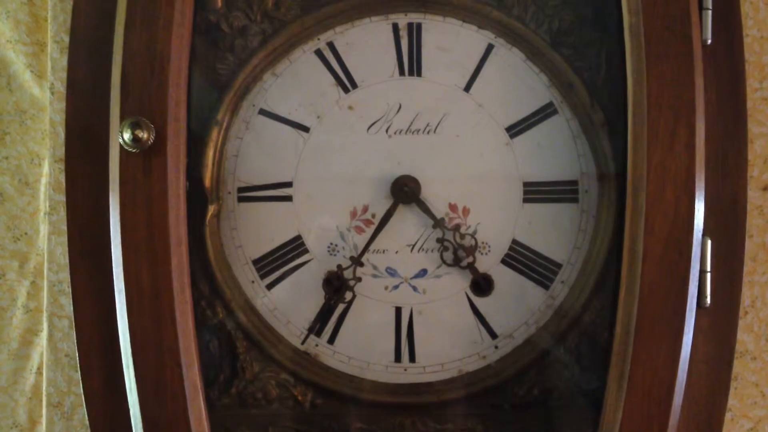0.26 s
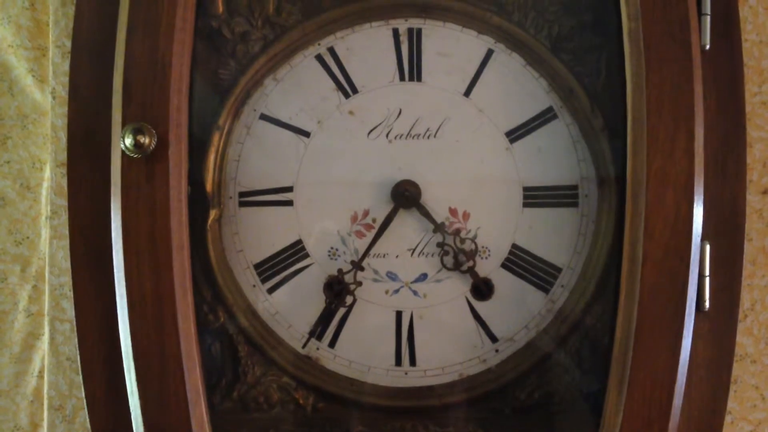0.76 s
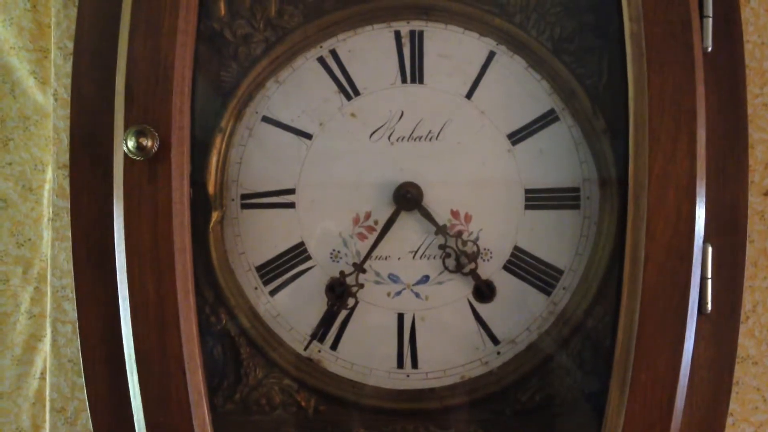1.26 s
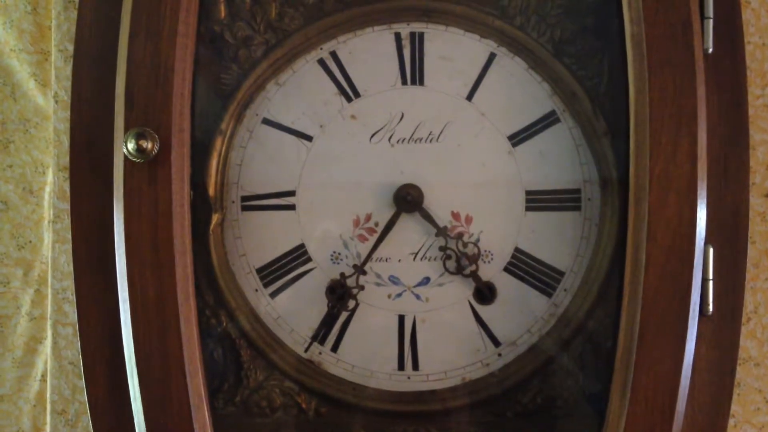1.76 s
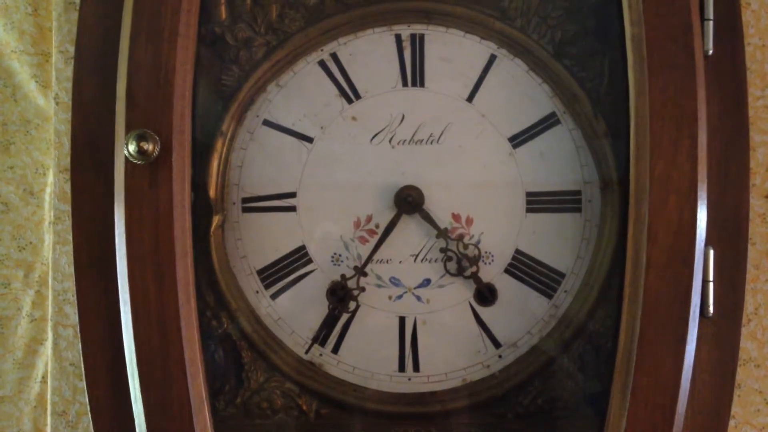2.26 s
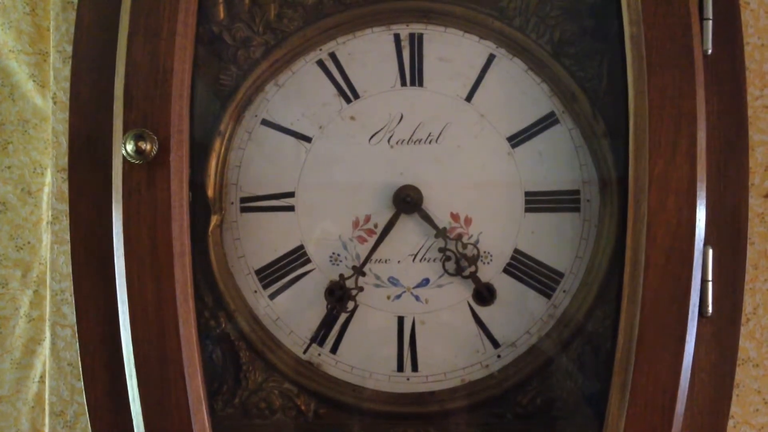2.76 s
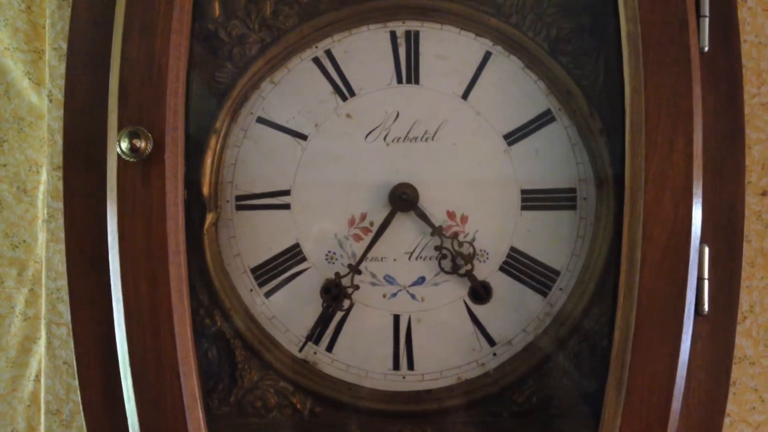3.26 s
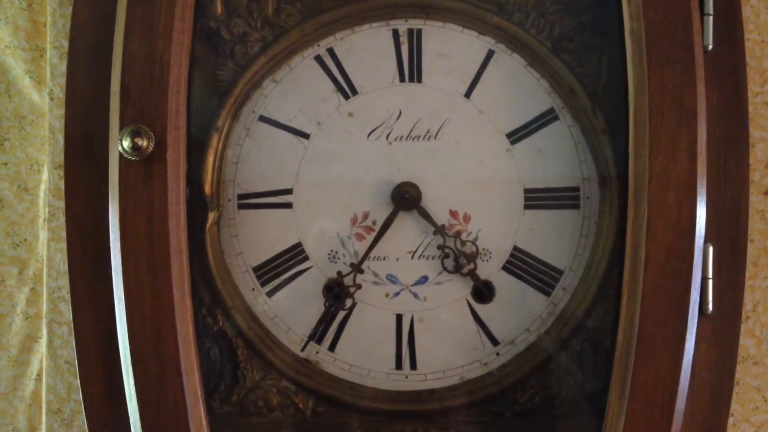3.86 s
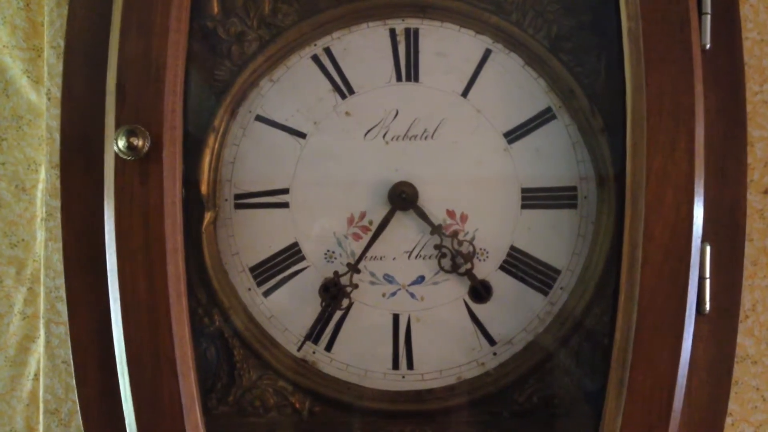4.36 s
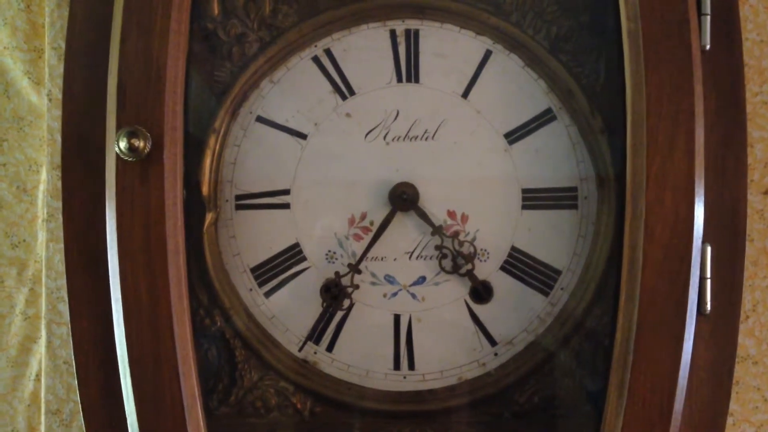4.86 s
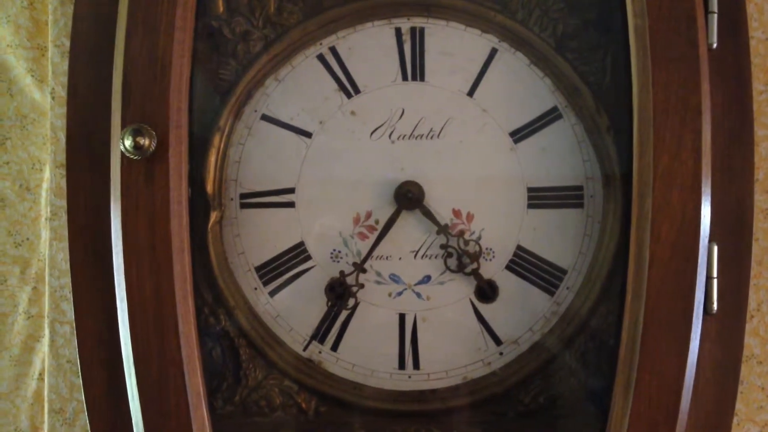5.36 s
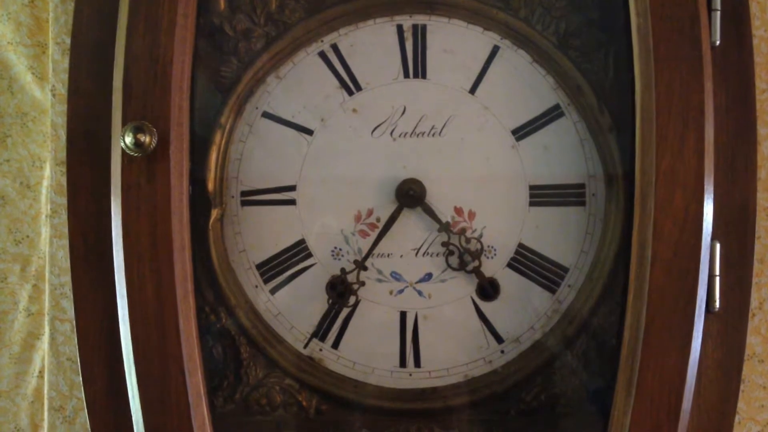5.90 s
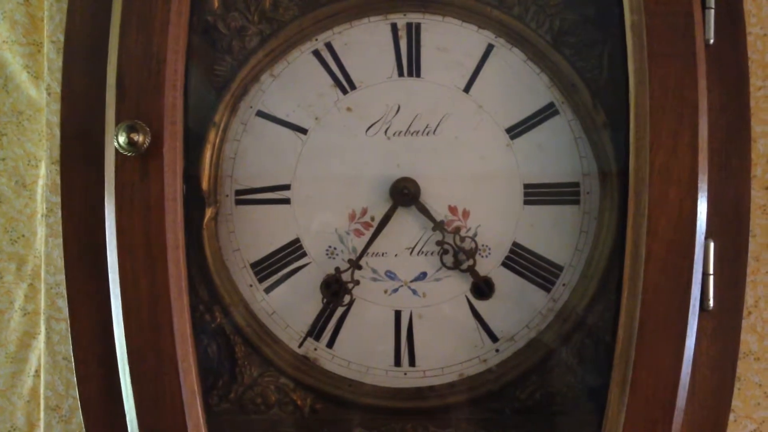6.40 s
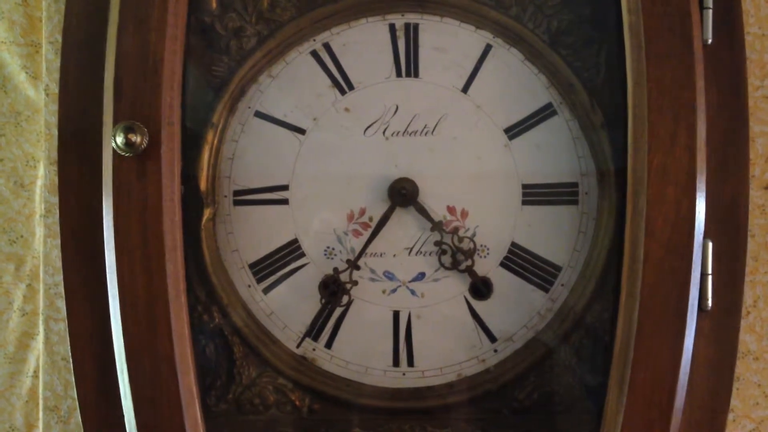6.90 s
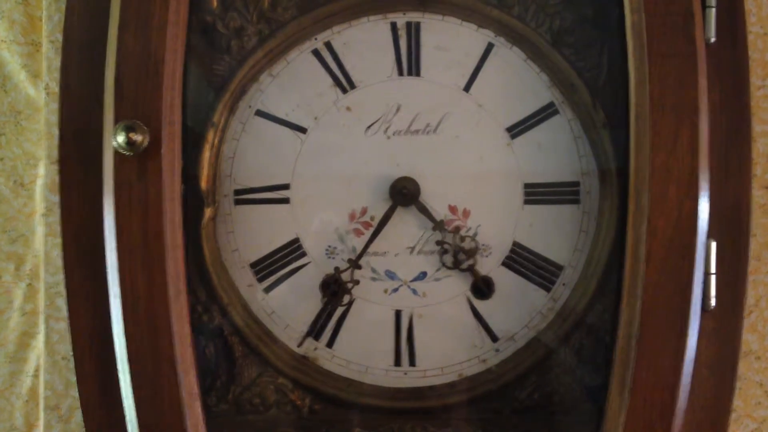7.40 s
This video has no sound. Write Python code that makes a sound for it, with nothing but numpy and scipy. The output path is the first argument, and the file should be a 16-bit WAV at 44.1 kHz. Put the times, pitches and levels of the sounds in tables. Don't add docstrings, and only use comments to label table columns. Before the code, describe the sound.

A tall wooden pendulum clock ticks and tocks slowly, each beat a crisp brassy click with a short woody knock, in a quiet room.

```python
import sys
import numpy as np
from scipy import signal
from scipy.io import wavfile

SR = 44100
rng = np.random.default_rng(int(sys.argv[2]) if len(sys.argv) > 2 else 0)


def output_pcm(signal):
    pcm = np.clip(np.atleast_2d(signal).T, -1, 1) * 32767
    wavfile.write(sys.argv[1], SR, np.round(pcm).astype(np.int16))


def how_loud(loudness_db):
    steps = np.asarray(loudness_db, float) / 20
    return 10 ** steps


N = 336924

# drop_s, lock_after_drop_s
BEATS = [
    (.336, .0141),
    (1.369, .0173),
    (2.5018, .0152),
    (3.5105, .0211),
    (4.6117, .0139),
    (5.645, .0178),
    (6.798, .0122),
]
# drop_db, slide_db, lock_db, rest_after_lock_s, rest_db
BLOWS = [(-23, -27, -22.5, .068, -44.5), (-32.5, -23.5, -24, .046, -42), (-22.5, -23.5, -21.5, .047, -46),
         (-29.5, -35, -18, .045, -57), (-21.5, -22, -22.5, 0.067, -48), (-30.5, -28.5, -19.5, .040, -42),
         (-22.5, -23.5, -21.5, .058, -38)]
# first_after_lock_s, gap_s, first_db, last_db
REBOUNDS = [(0.016, .013, -28, -44.5), (.0097, .008, -26.5, -33.5), (.011, .0085, -25.5, -40),
            (.0085, .0085, -24, -47), (.0135, 0.013, -22.5, -42), (.0055, .007, -22.5, -32.5),
            (.0138, .009, -22.5, -36)]
SLIDE_AFTER_DROP_S = 0.006
BOUNCE_STRETCH, BOUNCE_FADE_POWER = 1.12, 1.17


def contacts():
    rows = []
    for beat, ((drop_s, lock_after_s), blow, rebound) in enumerate(zip(BEATS, BLOWS, REBOUNDS)):
        drop_db, slide_db, lock_db, rest_s, rest_db = blow
        first_s, gap_s, first_db, last_db = rebound
        lock_s = drop_s + lock_after_s
        rows.append((drop_s, drop_db, beat, 0, 0))
        rows.append((drop_s + SLIDE_AFTER_DROP_S, slide_db, beat, 1, 0))
        rows.append((lock_s, lock_db, beat, 2, 0))
        age = np.cumsum(np.r_[0, gap_s * BOUNCE_STRETCH ** np.arange(3)])
        level = first_db + (last_db - first_db) * (age / age[-1]) ** BOUNCE_FADE_POWER
        rows += [(lock_s + first_s + a, db, beat, 3, a) for a, db in zip(age, level)]
        rows.append((lock_s + rest_s, rest_db, beat, 3, rest_s - first_s))
    return np.transpose(rows)


TICK_SHARES = {"case": (-6.5, 3, 2.5, 1.5, 90), "frame": (1.7, .5, 3, 1.7, 35),
               "plate": (-1.6, -2.5, 2.3, -0.5, -11), "wheel": (-0.3, .1, 0.3, -0.7, -5),
               "top": (-3, 3, 4.5, 3, -73)}
TOCK_SHARES = {"case": (2.5, 3.3, -8, -3.7, 129), "frame": (11, 3, -6, -0.5, 44),
               "plate": (1.5, 0, 1.4, -3.8, -40), "wheel": (-1.5, .1, -0.1, -0.7, -5),
               "top": (2.5, -2.5, -0.8, -0.8, -83)}
# case_db, frame_db, plate_db, wheel_db, top_db
TEETH = [(2, -0.5, 2.5, -1.5, 1.5), (-0.3, .1, 1, 0.3, -0.3), (0, -0.3, -1, 0.5, .1),
         (-0.3, -1, 1, -0.5, 0), (-0.5, -1.2, 0.5, .5, 1), (.1, 1, 1.5, -.5, 0.5),
         (0.8, -1.1, -0.5, .5, -0.5)]


def contact_db(hz, tick_db, tock_db):
    s, db, beat, role, age = contacts()
    beat, role = beat.astype(int), role.astype(int)
    tock = beat % 2 == 1
    parts = {2800: "case", 5800: "frame", 7700: "plate", 10000: "wheel", SR: "top"}
    part = next(name for upper_hz, name in parts.items() if hz < upper_hz)
    share = np.where(tock[:, None], TOCK_SHARES[part], TICK_SHARES[part])
    tooth_db = dict(zip(TICK_SHARES, np.transpose(TEETH)))[part][beat]
    pallet_db = np.where(tock, tock_db, tick_db)
    return db + pallet_db + share[np.arange(len(s)), role] + share[:, -1] * age + tooth_db


def clicks(times, sizes):
    train = np.full(N, 1e-18)
    train[np.round(np.asarray(times) * SR).astype(int)] = sizes
    return train


def ring(drive, hz, t60):
    r, w = how_loud(-60 / (t60 * SR)), 2 * np.pi * hz / SR
    return signal.lfilter([0, np.sin(w)], [1, -2 * r * np.cos(w), r * r], drive)


def swell(drive, seconds):
    r = np.exp(-1 / (seconds * SR))
    return signal.lfilter([(1 - r) ** 2], [1, -2 * r, r * r], drive)


def struck(modes, times, slide_s, gain_db, split):
    shape = len(times), len(modes)
    late, uneven, lean = rng.random(shape), rng.standard_normal(shape), rng.random(shape)
    out = np.zeros(N)
    for k, (hz, tick_db, tock_db, t60) in enumerate(modes):
        strength = how_loud(contact_db(hz, tick_db, tock_db) + 3.16 * uneven[:, k])
        arrival = times + slide_s * late[:, k] ** 2
        for side, share in ((-1.15, lean[:, k]), (0.92, lean[:, k] - 1)):
            out += ring(clicks(arrival, strength * share), hz * (1 + side * split), t60)
    return how_loud(gain_db) * out


# pitch_hz, tick_db, tock_db, t60_s
MOVEMENT = [(1521, -55, -17.5, 0.057), (1950, -25, -30, 0.1), (2242, -34, -39, 0.15),
            (2600, -30, -36, 0.12), (3402, -26.5, -21.5, 0.05), (4280, -18.5, -33, 0.038),
            (4426, -24, -29, 0.04), (4780, -26.5, -40, 0.047), (5363, -20.5, -18.5, 0.07),
            (6110, -22, -32, 0.088), (6590, -16, -15, 0.033), (6860, -8, -4.5, 0.037),
            (6850, -7.5, -7.5, 0.039), (7350, -13, -16.5, 0.041), (7800, -20, -30, 0.078),
            (8030, -28, -19.5, 0.053), (8270, -8.5, -2.5, 0.036), (8420, -16, -21.5, 0.13),
            (8560, -11.5, -10.5, 0.052), (8470, -27, -27, .055), (8920, -10.5, -11, 0.026),
            (9280, -19.5, -20, .06), (11080, -21.5, -14, 0.051), (11430, -25, -24, 0.043),
            (13600, -18, -22, 0.05), (15360, -21, -28, 0.036)]


def movement(times):
    return struck(MOVEMENT, times, slide_s=0.004, gain_db=1.5, split=0.0048)


# start_s, first_db, second_db, third_db
RODS = [(0.351, -56, -53, -60), (1.388, -48, -73, -64), (2.517, -48, -58, -60), (3.531, -56, -61, -60),
        (4.627, -48, -53, -60), (5.664, -45.5, -63, -58), (6.81, -60.5, -48, -45)]
# pitch_hz, t60_s
ROD_MODES = [(2425, 0.26), (2570, 0.33), (5320, 0.26)]


def rods():
    s, *levels = np.transpose(RODS)
    return sum(ring(clicks(s, how_loud(db)), hz, t60) for db, (hz, t60) in zip(levels, ROD_MODES))


def at_hz(points, hz):
    pitch, *columns = np.transpose(points)
    return [np.interp(np.log(hz), np.log(pitch), column) for column in columns]


def noise_bands(low_hz, high_hz, count):
    edges = np.geomspace(low_hz, high_hz, count + 1)
    white = rng.standard_normal((2, N))
    for k, (low, high) in enumerate(zip(edges, edges[1:])):
        sos = signal.butter(2, [low, high], "band", fs=SR, output="sos")
        yield np.sqrt(low * high), signal.sosfilt(sos, white[k % 2])


# pitch_hz, tick_db_per_hz, tock_db_per_hz, t60_s
RUSTLE = [(294.5, -15, -17.5, 0.6), (600, -15.5, -16, 0.45), (1187, -12.5, -19, 0.13),
          (2220, -16.5, -19.5, 0.28), (2750, -18, -20.5, 0.13), (4520, -15.5, -15.5, 0.13),
          (5900, -17, -23.5, 0.16), (6750, -15, -5, 0.048), (7800, -21.5, -11, 0.073),
          (8600, -10, -11, 0.1), (9660, -11, -30, 0.05), (11340, -12.5, -10, 0.074),
          (13500, -8, -6.5, 0.057), (16000, -12, -4, 0.0335)]


def rustle(times):
    out = np.zeros(N)
    for hz, band in noise_bands(300.3, 15900, count=26):
        tick_db, tock_db, t60 = at_hz(RUSTLE, hz)
        energy = clicks(times, how_loud(2 * contact_db(hz, tick_db, tock_db)))
        energy = signal.lfilter([1], [1, -how_loud(-120 / (t60 * SR))], energy)
        out += band * np.sqrt(swell(energy, seconds=0.00088 + 1.16 / hz))
    return how_loud(-0.5) * out


# pitch_hz, tick_db, tock_db, t60_s
CASE = [(96.8, -48, -50.5, 0.34), (134.2, -44, -42, 0.94), (172.8, -39.5, -43, 0.472),
        (231.3, -25, -25, 0.22), (322, -27.5, -41.5, 0.51), (378.7, -20, -50, 0.12), (460, -25, -30, 0.13),
        (548, -28.5, -34, 0.26), (611, -31.5, -38, 0.23), (717, -25.5, -31, 0.093), (795, -38, -34.5, 0.18),
        (860, -43, -54, 0.13), (975, -34, -36.5, 0.22), (1104, -31, -59, 0.053),
        (1251, -21.5, -29.5, 0.036), (1360, -26, -30, 0.092)]


def case(times):
    wood = struck(CASE, times + 0.003964, slide_s=0.012, gain_db=5.0, split=0.0063)
    return signal.sosfilt(signal.butter(2, 2500, fs=SR, output="sos"), wood)


# pitch_hz, t60_s, knock_db (level of the damped twin)
TRUNK = [(217.8, 0.63, -18), (260.3, 0.73, -10.5), (290.5, 0.46, -12.5), (344.2, 0.47, 4.5),
         (473, 0.43, 11.5)]
# tick_drop_db, tick_recoil_db, tock_drop_db, tock_recoil_db
TRUNK_DRIVE = [(-39, -53, -64.5, -47.5), (-50.5, -58.5, -71, -48.5), (-35, -41.5, -48, -44.5),
               (-45, -37, -67, -53.5), (-46.5, -39.5, -58, -57.5)]
# after_lock_s, strength_db, door_db, back_board_db, side_db
RECOILS = [(.014, -1.5, 1.5, -3.5, 1.5), (.030, -1, 1.5, 2, 2.5), (0.0081, -4.1, 3.5, -2, 1.8),
           (.030, 0, 0.5, 3, -1.2), (0.00895, -2.4, -4, 1, 2), (0.01484, -0.5, 3, 6.5, -6),
           (0.0121, 0, -6, 0, -4)]
DROP_PUSH_AFTER_S = 0.00802
SETTLE_AFTER_S, SETTLE_DB = 0.026, -7


def trunk():
    drop_s, lock_after_s = np.transpose(BEATS)
    after_s, db, door_db, back_db, side_db = np.transpose(RECOILS)
    recoil_s = drop_s + lock_after_s + after_s
    tock = np.arange(len(BEATS)) % 2 == 1
    s = np.r_[drop_s + DROP_PUSH_AFTER_S, recoil_s, recoil_s + SETTLE_AFTER_S]
    own_levels = [door_db, 0, back_db, 0, side_db]
    out = np.zeros(N)
    for k, ((hz, t60, knock_db), drive, own_db) in enumerate(zip(TRUNK, TRUNK_DRIVE, own_levels)):
        drop = np.where(tock, drive[2], drive[0]) + db + own_db
        recoil = np.where(tock, drive[3], drive[1]) + db + own_db
        level = how_loud(np.r_[drop, recoil, recoil + SETTLE_DB] + 0.5)
        push = swell(clicks(s, level * (-1) ** k), seconds=0.00025)
        out += ring(push, hz, t60) + how_loud(knock_db) * ring(push, 0.96 * hz, 0.45 * t60)
    return out


def rms_one(x):
    return x / np.sqrt(np.mean(x ** 2))


# peak_s, peak_db, upper_mode_db
THUMPS = [(0.043, -47, 4), (0.5, -60, 12), (0.798, -54, 7), (0.96, -57, -4), (1.553, -52, 2),
          (1.779, -61, -2), (1.856, -54, -11), (2.316, -59, -8), (2.597, -48.5, 6), (2.721, -52.5, 2),
          (2.99, -54, -7), (3.639, -56, 3), (3.848, -64.5, 0.1), (3.956, -57, -8), (4.458, -57.5, -4),
          (4.696, -50.5, 11.5), (4.92, -59, 6), (5.223, -57.5, -13), (5.77, -55.5, 0), (6.197, -56, 5.5),
          (6.939, -54.5, 3), (7.168, -54.5, 4.5)]
# pitch_hz, level_db, t60_s
THUMP_MODES = [(101.8, -3, 0.47), (131.6, 1.5, 0.32), (196.7, -7.5, 0.56)]


def thumps():
    s, db, high_db = np.transpose(THUMPS)
    out = np.zeros(N)
    for share_db, (hz, mode_db, t60) in zip([0, 0, high_db], THUMP_MODES):
        blow = clicks(s - 0.022, how_loud(db + share_db + mode_db - 4.0))
        sharp_rms = np.sqrt(np.mean(ring(blow, hz, t60) ** 2))
        soft = ring(ring(blow, hz, 0.07), hz, t60)
        out += rms_one(soft) * sharp_rms
    return out


RUMBLE_HZ, RUMBLE_T60_S = 60.9, 0.212
HUM_UNDER_THUMP_DB, HUM_FADE_DB_PER_S, HUM_REST_DB = -30, 45, -99


def rumble():
    s, db, _ = np.transpose(THUMPS)
    narrow = ring(rng.standard_normal(N), RUMBLE_HZ, RUMBLE_T60_S)
    narrow = ring(narrow, RUMBLE_HZ, RUMBLE_T60_S)
    stirred = clicks(np.maximum(s - 0.04, 0), how_loud(2 * (db + HUM_UNDER_THUMP_DB)))
    energy = signal.lfilter([1], [1, -how_loud(-2 * HUM_FADE_DB_PER_S / SR)], stirred)
    return np.sqrt(swell(energy, seconds=0.012) + how_loud(2 * HUM_REST_DB)) * rms_one(narrow)


# pitch_hz, level_db_per_hz
FLOOR = [(30, -42), (60, -45), (100, -4), (200, -3), (330, -11), (400, -5), (600, -7), (1100, -12),
         (2500, -16), (7500, -19), (11800, -21.5), (13600, -24.5), (15200, -22), (17000, -21)]
# pitch_hz, width_hz, level_db
ROOM_HUM = [(129, 7, -78.5), (211.3, 16, -73), (251.5, 33, -72), (314, 15.6, -69.5)]
FLOOR_DB = -62.5


def room_tone():
    bed = sum(how_loud(at_hz(FLOOR, hz)[0]) * band for hz, band in noise_bands(30.5, 17540, count=28))
    hum = np.zeros(N)
    for hz, width_hz, db in ROOM_HUM:
        hum += how_loud(db) * rms_one(ring(rng.standard_normal(N), hz, 1.8 / width_hz))
    return how_loud(FLOOR_DB - 3.5) * rms_one(bed) + hum


def scene():
    times = contacts()[0]
    brass = movement(times) + rods() + rustle(times)
    wood = case(times) + trunk()
    return (brass + wood + thumps() + rumble() + room_tone())[None]


def low_pass(x):
    return signal.sosfilt(signal.butter(12, 16680, fs=SR, output="sos"), x)


def record(dry):
    x = signal.sosfilt(signal.butter(5, 70, "high", fs=SR, output="sos"), dry)
    x = signal.sosfilt(signal.cheby2(12, 32, 16150, fs=SR, output="sos"), x)
    return low_pass(x)


dry = scene()
out = record(dry)
output_pcm(out)
```